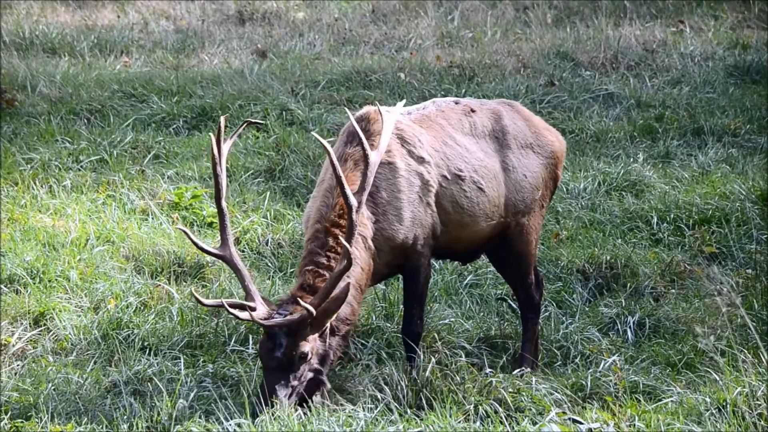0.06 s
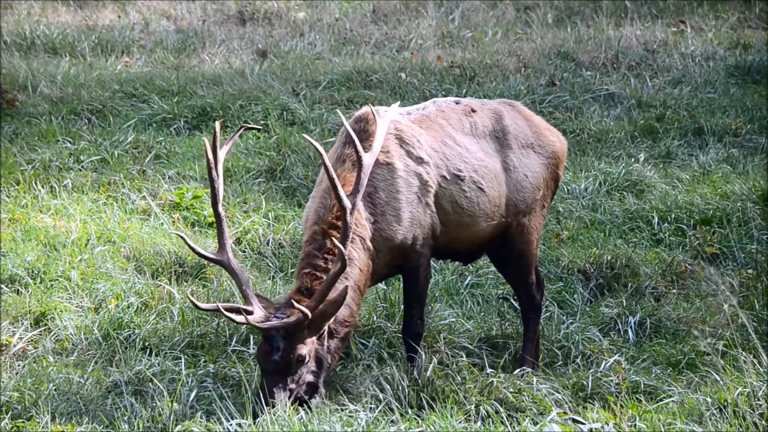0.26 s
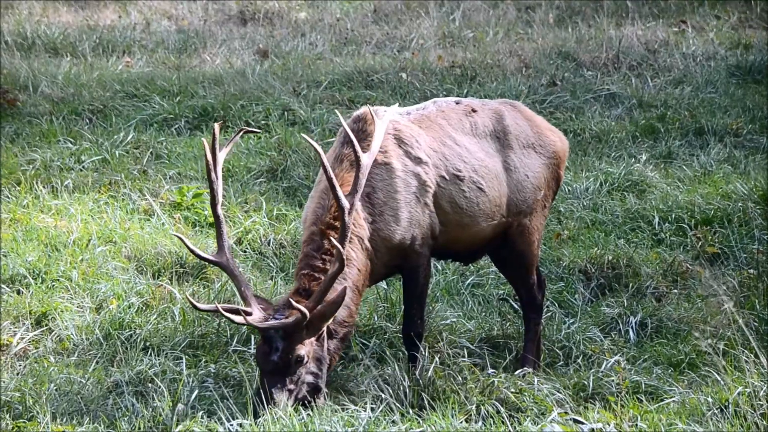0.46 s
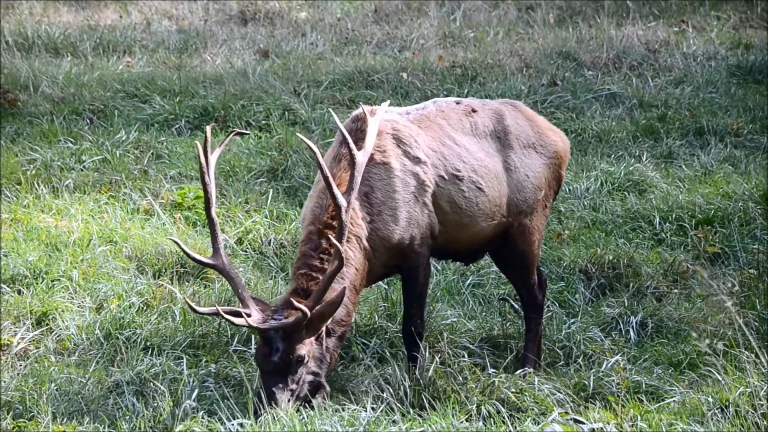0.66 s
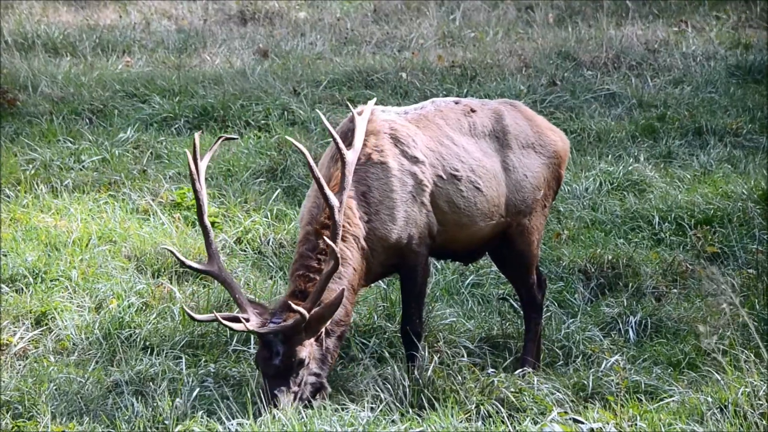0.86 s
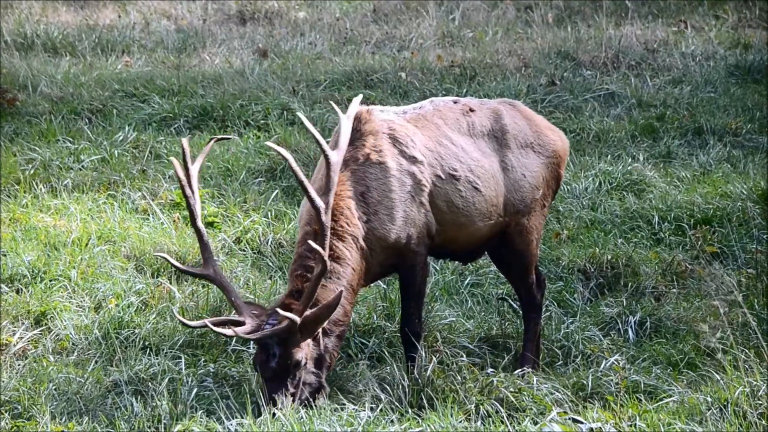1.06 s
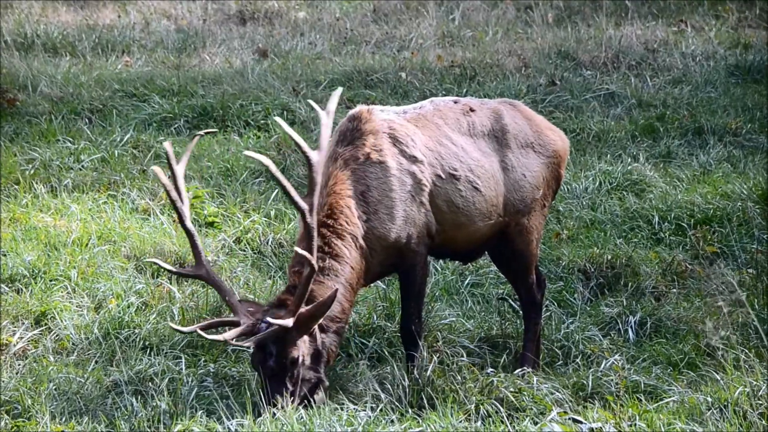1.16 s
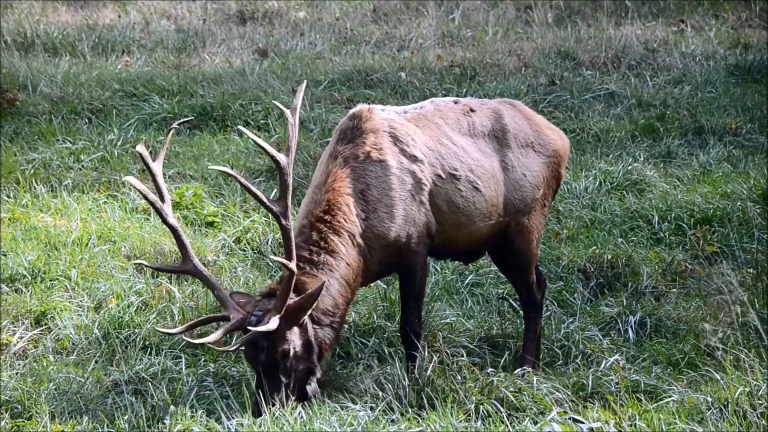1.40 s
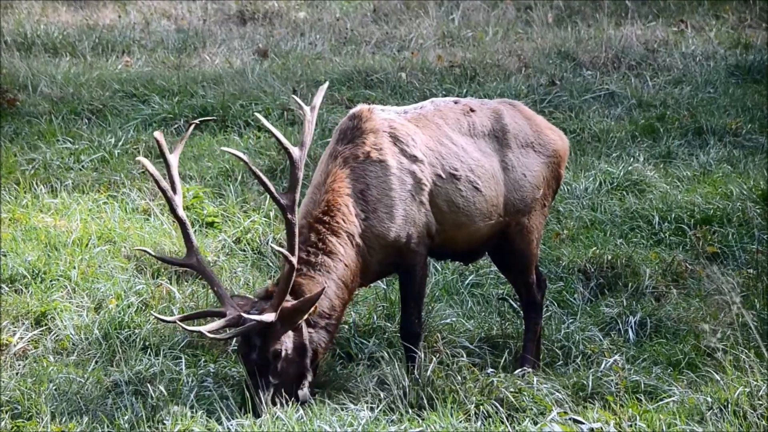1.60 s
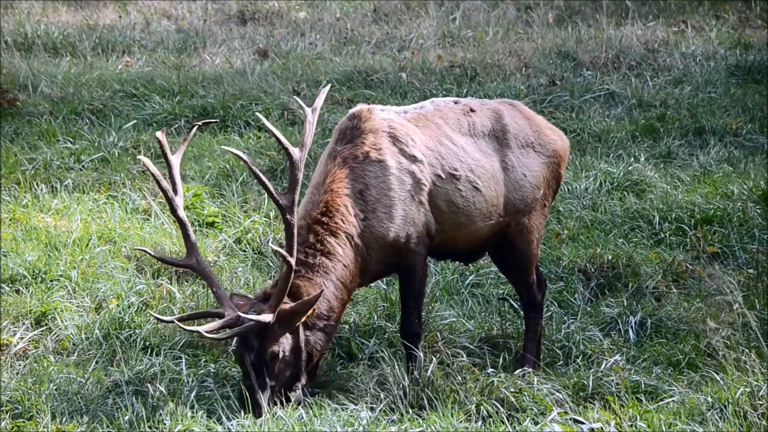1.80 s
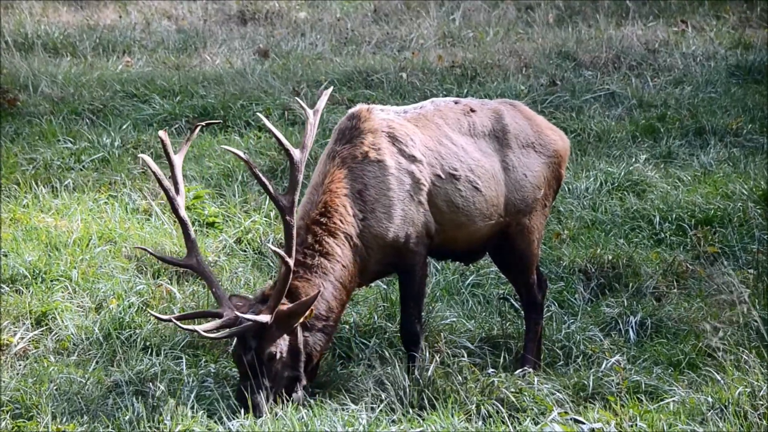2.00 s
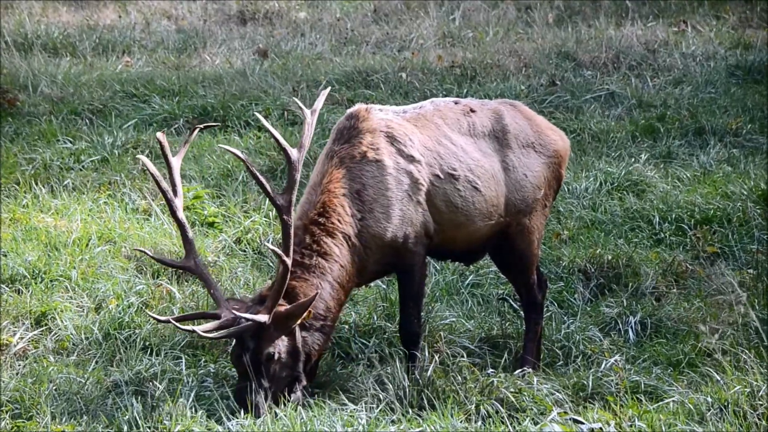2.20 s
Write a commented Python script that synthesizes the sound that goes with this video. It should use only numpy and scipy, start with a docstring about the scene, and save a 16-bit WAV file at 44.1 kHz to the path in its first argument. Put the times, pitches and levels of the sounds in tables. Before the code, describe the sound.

Light wind softly bumping the microphone over a steady far rush of air.

```python
"""A meadow where an elk grazes. A light breeze bumps the microphone in soft low puffs,
each eddy a quick swing of pressure, and rumbles between them. Now and then a grass stalk
snaps with a dry tick. Small crickets trill faintly with their wings, another insect gives
short high buzzes, and behind it all lies a steady far rush of air."""
import sys
import numpy as np
from scipy import signal
from scipy.fft import rfft, irfft, next_fast_len
from scipy.io import wavfile
from scipy.ndimage import map_coordinates

SR = 44100
rng = np.random.default_rng(int(sys.argv[2]) if len(sys.argv) > 2 else 0)


def pcm_store(signal):
    """Save signal as 16-bit PCM."""
    levels = np.round(np.clip(np.atleast_2d(signal), -1, 1) * 32767)
    wavfile.write(sys.argv[1], SR, levels.astype(np.int16).T)


N = 99225


def amp(db):
    """Decibels to gain."""
    return 10 ** (np.asarray(db) / 20)


def unit(x):
    """Scale to rms 1."""
    return x / np.sqrt(np.mean(x ** 2) + 1e-20)


def wobble(rate):
    """A smooth random curve, rate knots a second."""
    return map_coordinates(rng.standard_normal(int(N * rate / SR) + 4), [np.arange(N) * rate / SR])


def filtered(x, response):
    """x times a response of frequency."""
    m = next_fast_len(N + 8192)
    return irfft(rfft(x, m) * response(np.fft.rfftfreq(m, 1 / SR)), m)[:N]


def noise(spectrum):
    """Noise of rms 1 coloured by (Hz, dB) points."""
    f, db = np.transpose(spectrum)
    white = rng.standard_normal(N)
    return unit(filtered(white, lambda hz: amp(np.interp(np.log(hz + 1), np.log(f), db))))


def hump(u):
    """A smooth rise and fall for u from -1 to 1."""
    return np.cos(np.pi / 2 * np.clip(u, -1, 1)) ** 2


# Eddies hitting the microphone: peak_s, level_db, half_length_s, pitch_hz
EDDIES = [(.25, -47, .01, 90.5), (0.295, -33, 0.005, 86), (0.318, -34, 0.0058, 107),
          (0.438, -39, 0.0067, 124), (0.47, -24.5, 0.0033, 143), (0.485, -36, 0.0069, 65),
          (.557, -31, 0.006, 92), (0.585, -38.5, .005, 124), (0.693, -37, 0.0068, 87),
          (.735, -41, 0.016, 121), (.762, -32, 0.0057, 88), (.829, -28.5, 0.0055, 113),
          (0.848, -29.5, .005, 118), (.888, -39, .005, 111), (.997, -31, 0.0055, 100),
          (1.03, -22.5, .013, 108.6), (1.107, -46.5, .006, 120), (1.129, -42.5, 0.011, 91),
          (1.161, -42.5, 0.0094, 102), (1.641, -39, 0.0096, 78), (1.726, -34, 0.0045, 160),
          (1.766, -48, .007, 90), (1.813, -35, 0.0046, 103), (1.926, -41, 0.0052, 90),
          (1.958, -39.5, 0.016, 97), (1.986, -28.5, 0.0058, 116), (2.035, -38, 0.0067, 115),
          (2.057, -36, 0.0037, 123)]
# Colour of the rough air inside an eddy: frequency_hz, level_db
TURBULENCE_SPECTRUM = [(20, 10), (50, -10), (120, -7), (260, -1.5), (380, -13), (700, -38), (1500, -90)]


def wind_puffs(t, trim_db=-.5, roughness=.34, wander_rad=.22):
    """Soft low bumps: each eddy swings the pressure once or twice and carries a little turbulence."""
    out = np.zeros(N)
    turbulence = noise(TURBULENCE_SPECTRUM)
    drift = wander_rad * wobble(120)
    for peak_s, level_db, half_length_s, pitch_hz in EDDIES:
        swing = np.cos(2 * np.pi * pitch_hz * (t - peak_s) + rng.uniform(0, 2 * np.pi) + drift)
        envelope = np.exp(-((t - peak_s) / half_length_s) ** 2)
        out += amp(level_db + trim_db) * envelope * (swing + roughness * turbulence)
    return out


# Rise and fall of the breeze: time_s, level_db
BREEZE_LEVELS = [(0, -68), (.17, -57), (.26, -49), (.38, -59), (.48, -54), (.65, -62), (.83, -48),
                 (.93, -61), (1.02, -44.5), (1.2, -64), (1.55, -68), (1.75, -58), (1.87, -64), (1.98, -52),
                 (2.25, -56)]
# Colour of its rumble: frequency_hz, level_db
RUMBLE_SPECTRUM = [(15, -10), (28, -5.5), (50, 3.5), (90, -2.5), (160, -7.5), (280, -17), (500, -52),
                   (1000, -75)]


def breeze_rumble(t, trim_db=-.5):
    """The breeze rumbles on the microphone, swelling and sinking under the puffs."""
    level_db = np.interp(t, *np.transpose(BREEZE_LEVELS))
    return noise(RUMBLE_SPECTRUM) * amp(level_db + trim_db)


# Grass stalks breaking: start_s, level_db, centre_hz, width_octaves, t60_s
STALK_SNAPS = [(.112, -59.5, 5200, 0.58, 0.017), (0.354, -45.5, 2530, 0.65, 0.03),
               (.481, -59, 5500, .55, .015), (.970, -53.5, 3400, 0.75, 0.022),
               (1.014, -54.5, 3000, 0.45, .04), (1.151, -65, 8500, .5, .02), (2.222, -67, 9000, .5, .02)]


def stalk_snaps(t, attack_s=.0012):
    """A stalk breaks with a dry tick that dies at once."""
    out = np.zeros(N)
    for start_s, level_db, centre_hz, width_octaves, t60_s in STALK_SNAPS:
        white = rng.standard_normal(N)
        crack = filtered(white, lambda hz: np.exp(-.5 * (np.log2((hz + 1) / centre_hz) / width_octaves) ** 2))
        attack = np.clip((t - start_s) / attack_s, 0, 1)
        out += attack * amp(level_db - 60 * np.abs(t - start_s) / t60_s) * unit(crack)
    return out


# Runs of cricket chirps: start_s, end_s, pitch_hz, period_s, level_db
CRICKET_TRILLS = [(.05, .5, 8950, .062, -76), (.035, .21, 8930, .056, -77), (.014, 1.02, 8100, .064, -76.5),
                  (.44, 2.24, 7670, .0705, -79), (.545, 1.12, 8920, .0615, -80),
                  (1.11, 1.72, 8090, .0645, -77), (1.14, 1.42, 8600, .054, -78),
                  (1.35, 1.92, 8900, .061, -78), (1.79, 1.96, 8280, .074, -77)]


def crickets(t, chirp_s=.036, arch_hz=500, fall_hz=130, scatter_db=1.2, drift_s=.003, blur_rad=.45):
    """Each wing stroke is a short tone that arches and falls; the pace drifts and grass blurs it."""
    out = np.zeros(N)
    for start_s, end_s, pitch_hz, period_s, level_db in CRICKET_TRILLS:
        clock = t - start_s + drift_s * wobble(9)
        stroke = np.round(clock / period_s)
        position = np.clip((clock - stroke * period_s) / (chirp_s / 2), -1, 1)  # within the chirp
        accent = rng.standard_normal(size=256).take(stroke.astype(int), mode="wrap")
        singing = (stroke >= 0) & (start_s + stroke * period_s <= end_s)
        glide_hz = pitch_hz - arch_hz * position ** 2 - fall_hz * position
        tone = np.sin(2 * np.pi * np.cumsum(glide_hz) / SR + blur_rad * wobble(400))
        out += singing * hump(position) * amp(level_db + scatter_db * accent) * tone
    return out


# Short buzzes of another insect: peak_s, length_s, pitch_hz, level_db
INSECT_BUZZES = [(0.237, .08, 9600, -73), (0.717, .11, 8850, -77), (2.085, 0.099, 8800, -80)]


def insect_buzzes(t, wingbeat_hz=73, blur_rad=1.1):
    """A narrow hiss chopped by fast wing beats."""
    out = np.zeros(N)
    beats = np.sin(np.pi * wingbeat_hz * t) ** 2
    for peak_s, length_s, pitch_hz, level_db in INSECT_BUZZES:
        envelope = np.sqrt(hump((t - peak_s) / (length_s / 2)))
        hiss = np.sin(2 * np.pi * pitch_hz * t + blur_rad * wobble(700))
        out += amp(level_db) * envelope * beats * hiss
    return out


# Colour of the far rush: frequency_hz, level_db
RUSH_SPECTRUM = [(20, -24), (50, -3), (100, -2.5), (200, -2.5), (400, -3.5), (700, 0.5), (1200, -2),
                 (2000, -8), (3000, -16), (4000, -23.5), (5000, -29.5), (7000, -34.5), (8500, -35),
                 (10000, -43), (15500, -46)]
# Colour of its dull low end: frequency_hz, level_db
LOW_END_SPECTRUM = [(20, -30), (60, -6), (110, 0), (250, -2), (400, -11.5), (800, -32), (2000, -70)]
# Slow swell of that low end: time_s, level_db
LOW_END_LEVELS = [(0, -58.5), (.3, -57.5), (1.1, -55.5), (1.7, -55.5), (2.25, -55.5)]


def far_air(t, rush_db=-47, sway_db=.15):
    """A steady bed of distant air that barely sways; its dull low end swells slowly."""
    low_end = noise(LOW_END_SPECTRUM) * amp(np.interp(t, *np.transpose(LOW_END_LEVELS)))
    rush = noise(RUSH_SPECTRUM) * amp(rush_db + sway_db * wobble(2.27))
    return rush + low_end


def scene():
    """Wind up front, small sounds in the grass and the far air behind, mixed in mono."""
    t = np.arange(N) / SR
    bed = far_air(t)
    wind = wind_puffs(t) + breeze_rumble(t)
    grass = crickets(t) + insect_buzzes(t) + stalk_snaps(t)
    return (wind + grass + bed)[None]


def record(dry):
    """The camera's low cut thins the deepest wind; nothing passes above its band limit."""
    low_cut_hz, top_hz = 36, 15700
    low_cut = signal.butter(2, low_cut_hz, "highpass", fs=SR, output="sos")
    return filtered(signal.sosfilt(low_cut, dry[0]), lambda hz: hz < top_hz)[None]


dry = scene()
out = record(dry)
pcm_store(out)
```